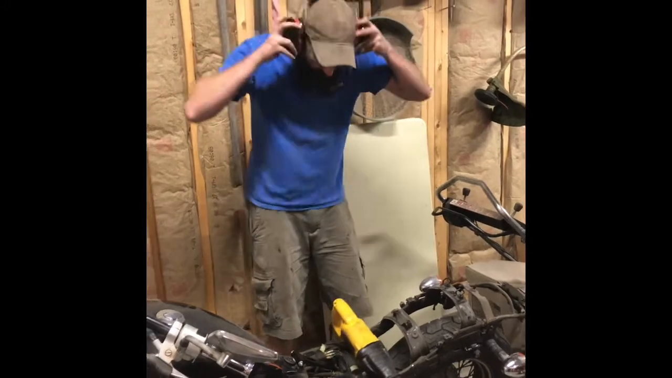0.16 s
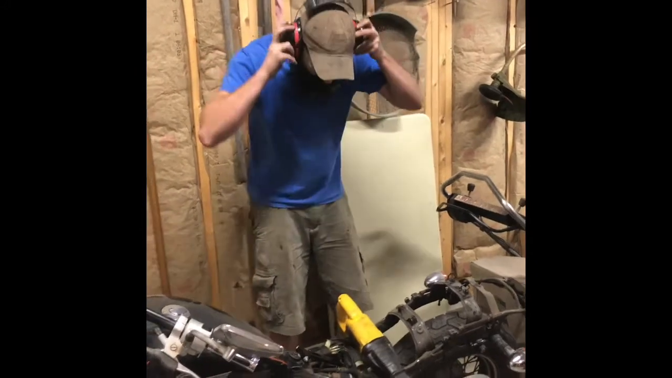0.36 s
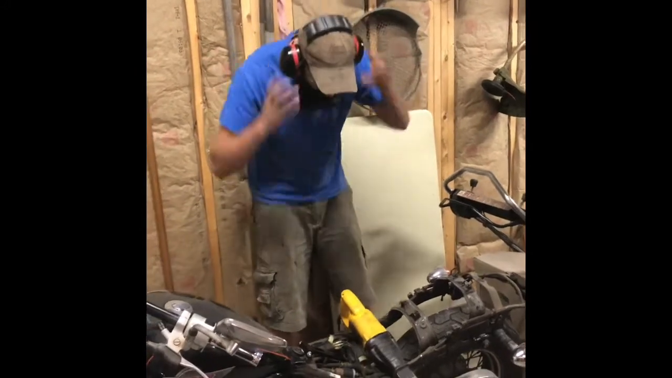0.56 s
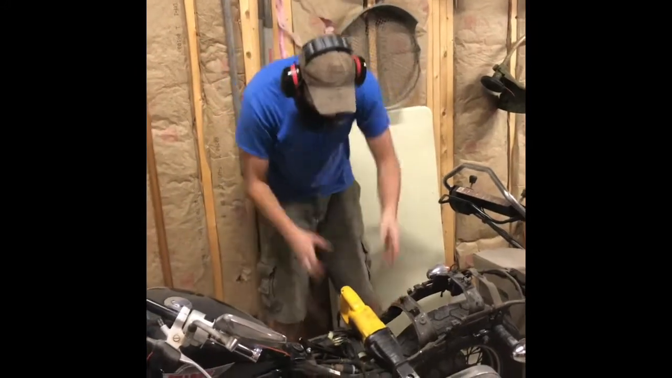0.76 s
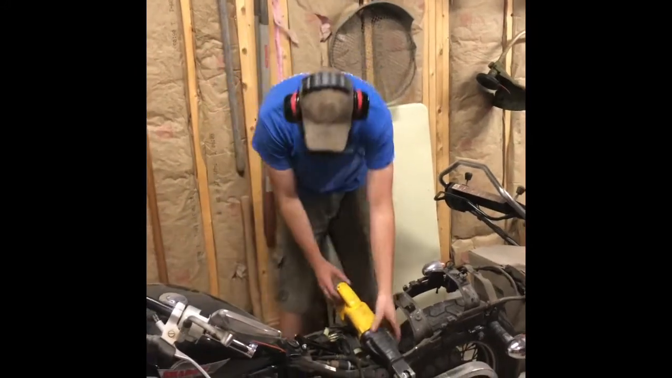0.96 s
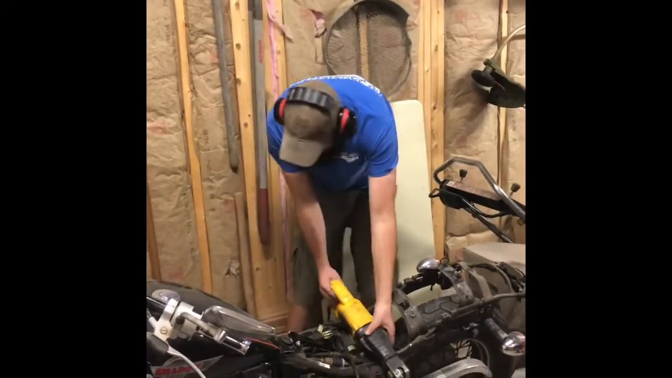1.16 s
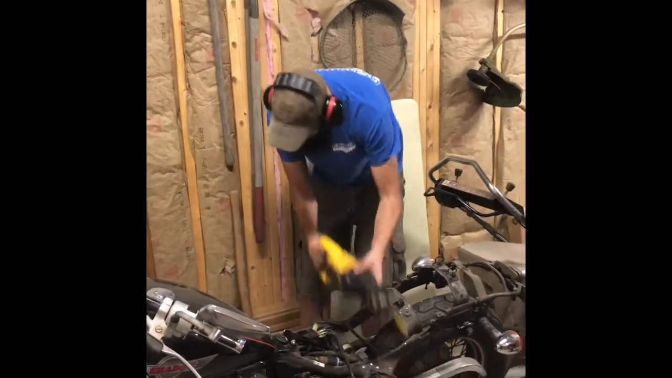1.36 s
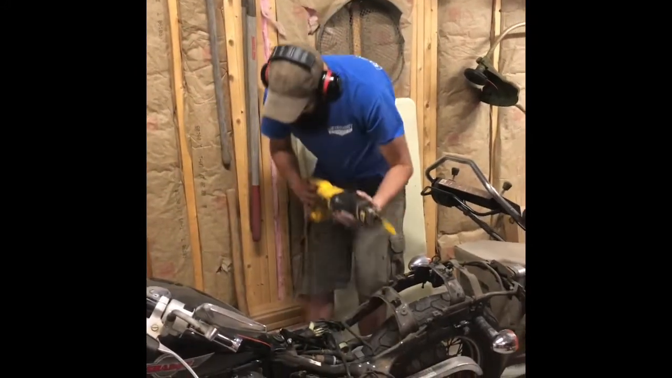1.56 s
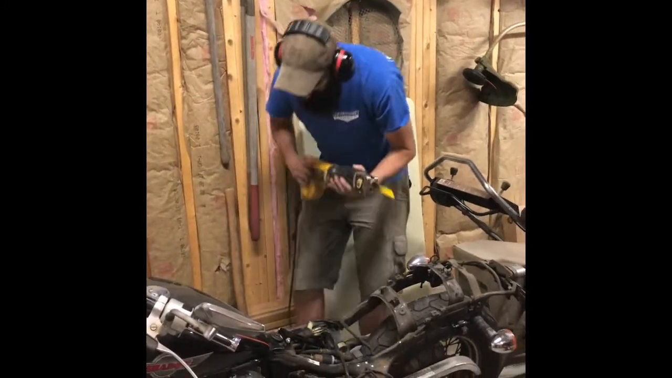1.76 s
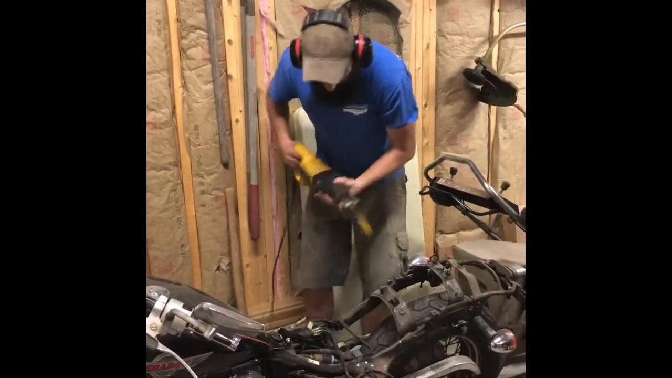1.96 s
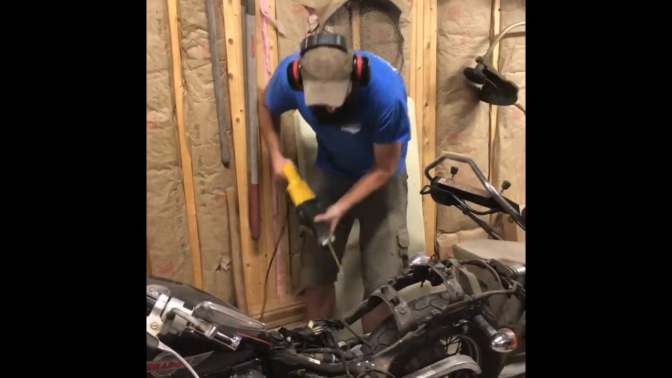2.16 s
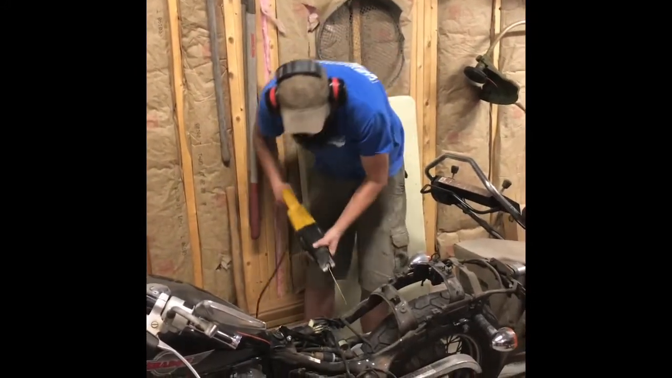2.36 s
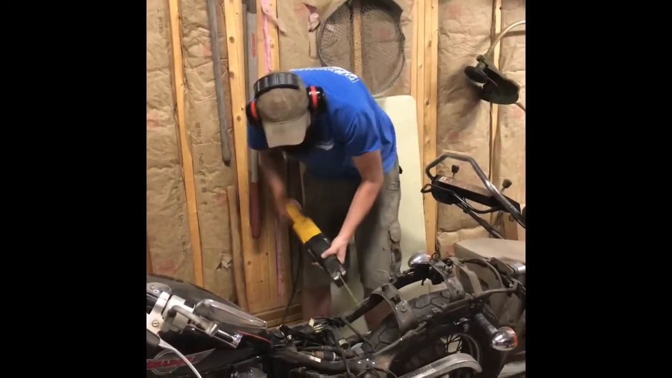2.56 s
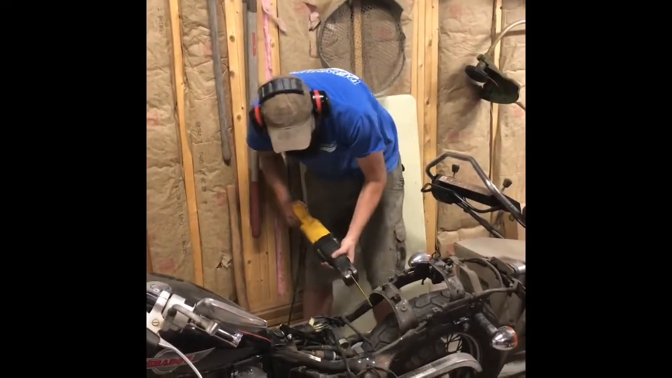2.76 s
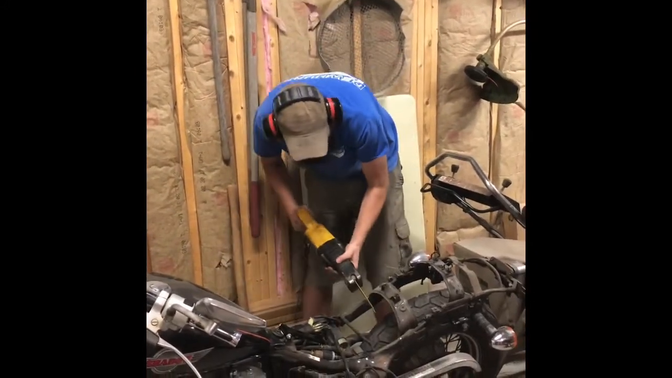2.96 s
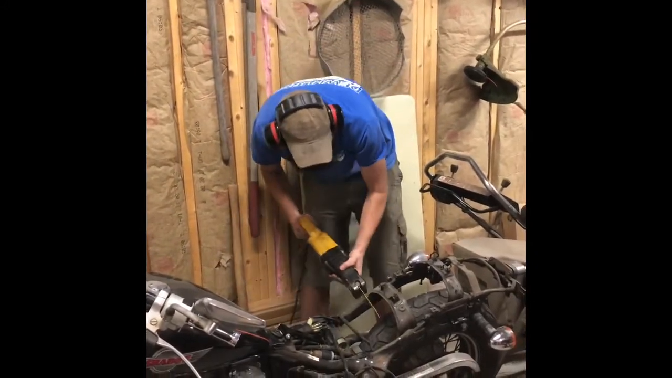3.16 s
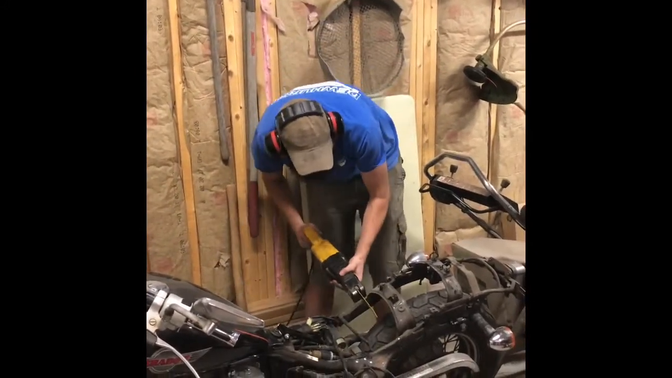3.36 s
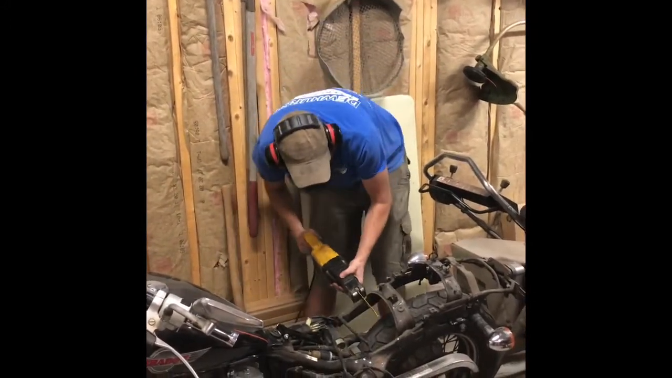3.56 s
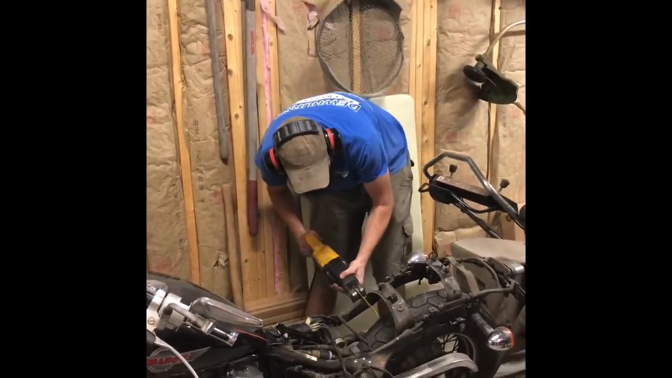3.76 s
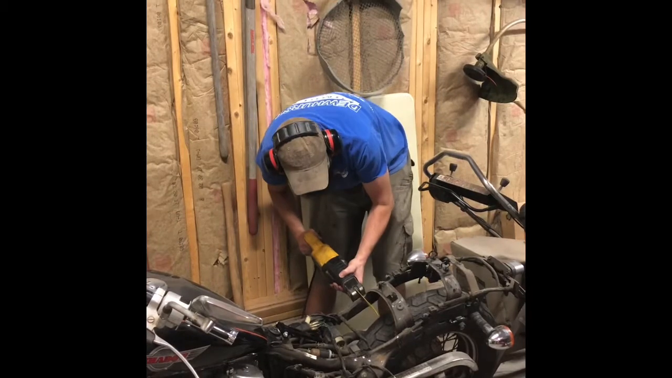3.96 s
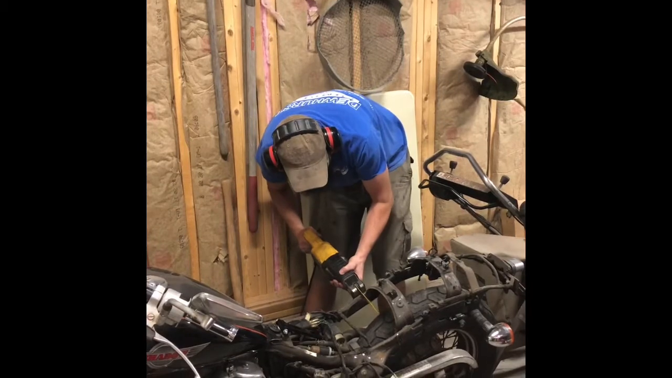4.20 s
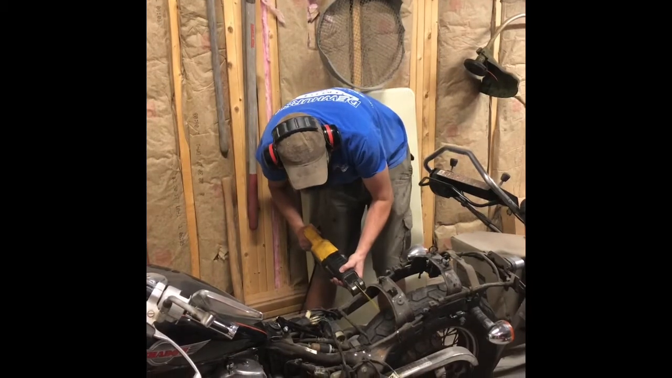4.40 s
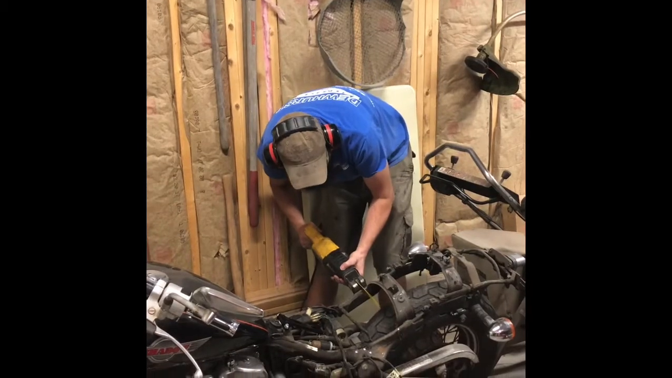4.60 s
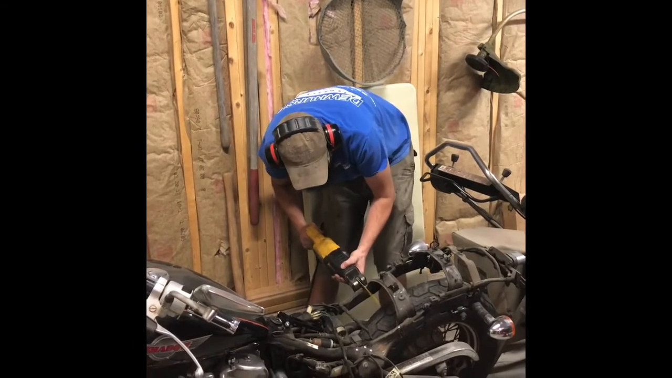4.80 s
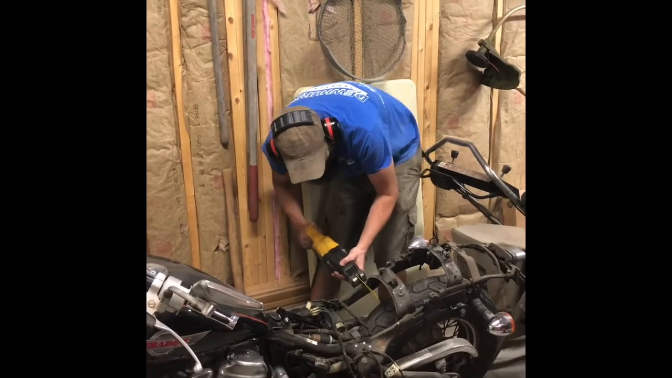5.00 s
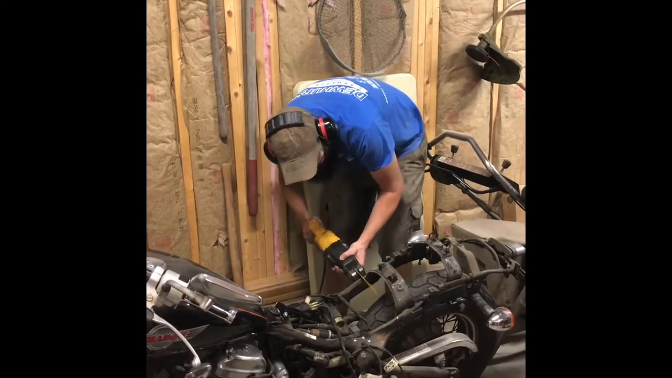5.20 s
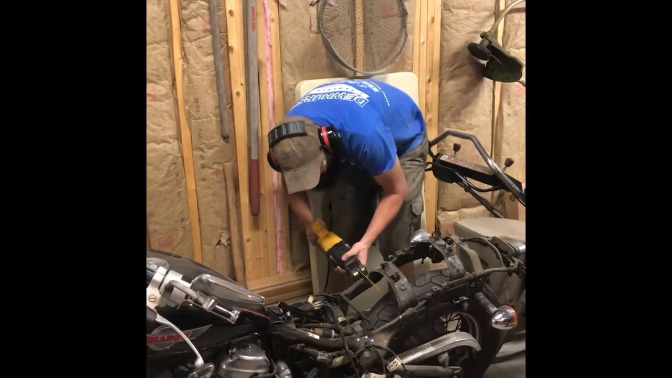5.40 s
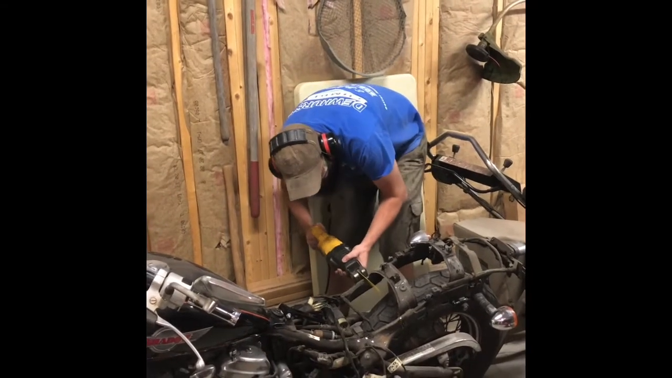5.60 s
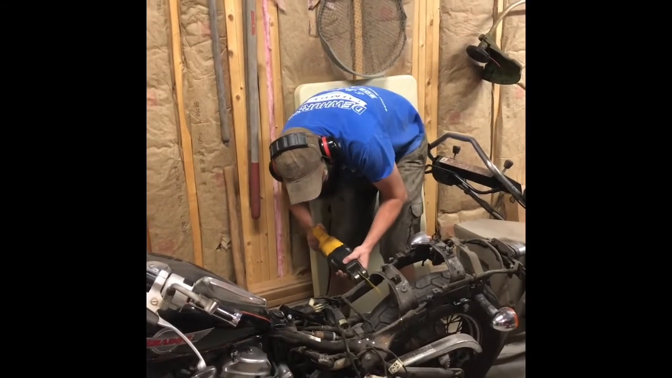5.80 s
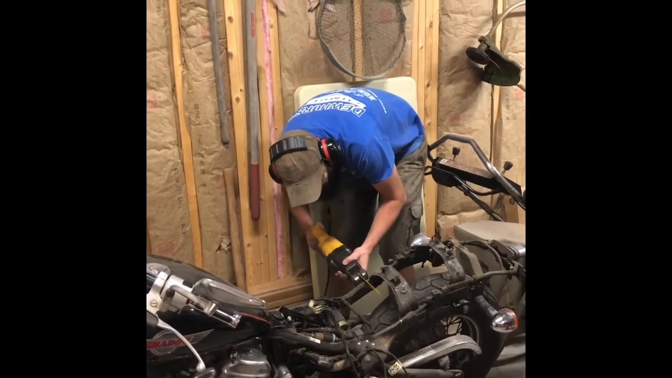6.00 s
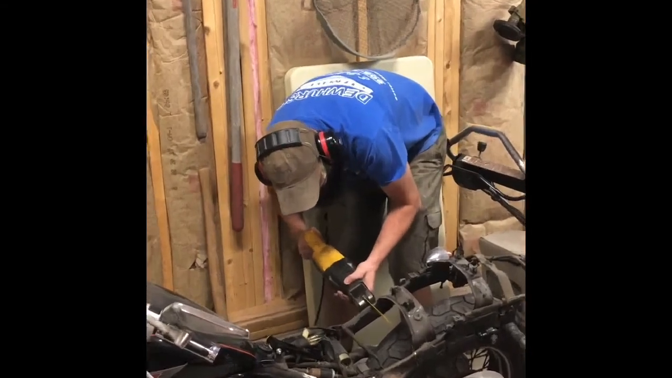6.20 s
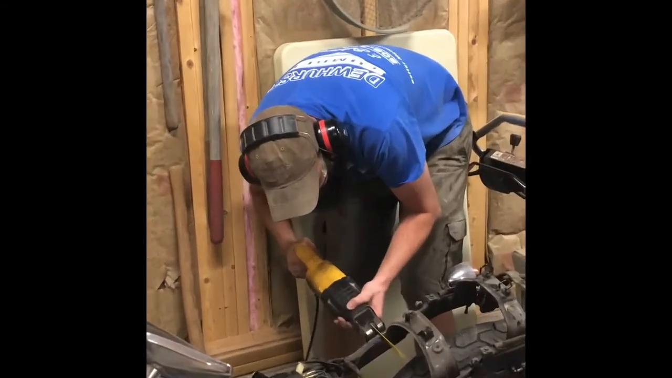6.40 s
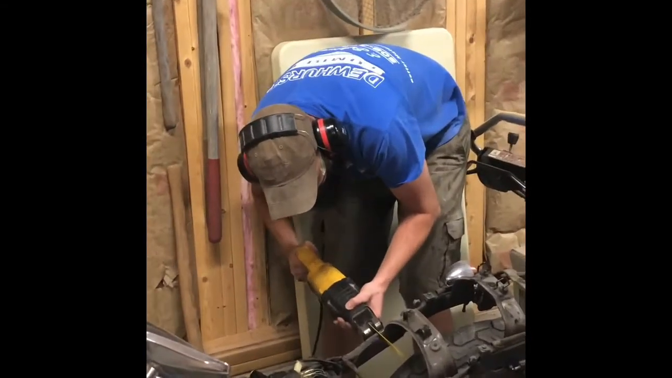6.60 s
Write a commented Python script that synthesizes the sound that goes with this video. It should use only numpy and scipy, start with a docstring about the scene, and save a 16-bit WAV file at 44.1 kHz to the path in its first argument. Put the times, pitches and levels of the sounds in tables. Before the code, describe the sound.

Faint rustling and small knocks, then a reciprocating saw speeds up and cuts loudly into steel in a small workshop.

```python
"""A reciprocating saw cuts into a steel motorcycle frame in a small workshop, slowly, then at full speed.
Its crank clatters by impact twice a stroke, its armature whines at multiples of the shaft speed,
and the teeth drive the steel into resonance as they bite deeper. Before that the saw is picked up:
clothes rustle by friction, the tool scrapes off its rest, feet thump on the floor, the trigger clicks."""
import sys
import numpy as np
from scipy import signal
from scipy.fft import rfft, irfft
from scipy.io import wavfile

SR = 44100
rng = np.random.default_rng(int(sys.argv[2]) if len(sys.argv) > 2 else 0)


def to_wav(s):
    """Save 16-bit WAV."""
    ch = np.atleast_2d(s).T  # columns
    pcm = np.round(np.clip(ch, -1, 1) * 32767)  # PCM
    wavfile.write(sys.argv[1], SR, pcm.astype(np.int16))


N = 293265
TIME = np.arange(N) / SR
GEAR_RATIO = 10  # shaft turns per stroke


def saw(shaft_hz):
    """Synchronous excitation: one shaft paces the clatter, rasp, whine and hum of the saw."""
    turns = np.cumsum(shaft_hz) / SR
    strokes = turns / GEAR_RATIO
    fast = np.clip((shaft_hz - 165) / 80, 0, 1)  # 0 when slow, 1 near full speed
    whine, hum = motor(shaft_hz, turns, strokes, fast)
    direct = crank(shaft_hz, strokes, fast) + cutting(shaft_hz, strokes) + whine
    # the tool rocks in the hands, so its echoes keep changing
    poses = np.array([wander(hz=8.4) for _ in range(4)])
    echoes = sum(workshop(direct * pose) for pose in poses / np.linalg.norm(poses, axis=0))
    # the tool is too small to radiate deep bass
    small_body = signal.butter(3, 85, "highpass", fs=SR, output="sos")
    effort = driven(shaft_hz, db=9, full_hz=278, db_per_octave=5.5, bite_db=4.5)
    return effort * signal.sosfilt(small_body, amp(-1.5) * direct + amp(-5) * echoes + hum)


def crank(shaft_hz, strokes, fast):
    """Backlash: the crank's play closes at each reversal with a burst of impact noise."""
    # clatter spectra at low and at full speed (frequency [Hz], relative level [dB])
    slow_spectrum = [(20, -70), (60, -25), (117, -7.5), (209, -47), (309, -2), (458, -11), (620, -1),
                     (800, -3), (916, 4.5), (1150, 3.5), (1630, 4.5), (2590, 0.5), (4110, -4), (15000, -17)]
    fast_spectrum = [(20, -75), (65, -56), (130, -34), (300, -46), (480, -32.5), (680, -9), (800, -14),
                     (1100, -9.5), (1700, -1.5), (2400, 1.5), (3500, -1.5), (6000, -5), (15000, -22.5)]
    beat = blows(strokes, phase=.096, decay=.73, back_db=.1, uneven_db=.06)
    knocks = evened(beat + .4) * grit(per_s=16000, spread_db=2)
    slow_clatter = (1 - fast) ** .95 * coloured(knocks, slow_spectrum)
    fast_clatter = amp(-3.5) * np.sqrt(fast) * coloured(knocks, fast_spectrum)
    gain = driven(shaft_hz, db=-19, full_hz=89.3, db_per_octave=12, bite_db=2, curve=3)
    return gain * (slow_clatter + fast_clatter)


def cutting(shaft_hz, strokes):
    """Impact excitation: the teeth rasp with each stroke, and blade and frame ring in their modes."""
    # spectrum of the teeth (frequency [Hz], relative level [dB])
    rasp = [(20, -90), (120, -65), (500, -44), (1500, -14), (2600, -2), (4300, 2.5), (6000, 1), (7500, 1),
            (9500, 0.5), (12000, -2), (14000, -2), (16000, -5.5)]
    # steel resonances (frequency [Hz], bandwidth [Hz], relative level [dB])
    blade_modes = [(2846, 40, -6.5), (3054, 100, 0.5), (3185, 110, -6.5), (4320, 55, -8), (4900, 380, -6.5),
                   (6670, 420, -6), (8500, 310, -2.5), (10430, 400, -5.5), (11300, 810, -2.5)]
    frame_modes = [(1136, 300, -9), (1396, 52, -2.5), (1856, 67, 2.5), (2305, 30, -4)]
    rasp_gain = driven(shaft_hz, db=-18.5, full_hz=169, db_per_octave=17.5, bite_db=1.5, curve=5.4)
    blade_gain = driven(shaft_hz, db=-34, full_hz=115, db_per_octave=20, bite_db=13.5, curve=1.2)
    frame_gain = driven(shaft_hz, db=-43.5, full_hz=79.4, db_per_octave=9, pressure_db=16.5)
    beat = blows(strokes, phase=.096, decay=.73, back_db=.1, uneven_db=.06)
    teeth = evened(beat + 2.4) * grit(per_s=14000, spread_db=-2.5)
    # the teeth catch sharply as the blade reverses
    bites = blows(strokes, phase=.12, decay=.27, back_db=-1, uneven_db=1.2)
    bites *= grit(per_s=14000, spread_db=1)
    # the shoe knocks against the frame on every pull, softly on the way back
    shoe = blows(strokes, phase=.18, decay=.15, back_db=-6, uneven_db=1.5) * rng.standard_normal(N)
    steel = blade_gain * ring(bites, blade_modes) + frame_gain * ring(shoe, frame_modes)
    return rasp_gain * coloured(teeth, rasp) + steel


def motor(shaft_hz, turns, strokes, fast):
    """Modulation and forced vibration: the stroke's load swings the whine; the shaken housing hums."""
    # commutator harmonics (multiple of the shaft speed, relative level [dB])
    harmonics = [(22, 1), (16, -2), (33, -6.5), (42, -6), (44, -21)]
    # housing response to the whine and to the crank's shaking (frequency [Hz], gain [dB])
    whine_response = [(1000, -12), (1420, 4.5), (1680, 1.5), (1850, -5), (2300, -11), (2560, 4.5),
                      (2900, 1), (3150, -3.5), (3400, 2), (3510, -4), (3610, 5), (3800, -1), (4700, -2),
                      (5120, 2.5), (5600, 0), (6800, 1.5), (14000, 1)]
    shake_response = [(40, -58), (95, -22), (125, -20.5), (150, -22), (185, -10.5), (210, -24.5), (235, -9),
                      (275, -32.5), (375, -20), (440, -18.5), (500, -27), (600, -8), (700, -11.5),
                      (850, -19.5), (1150, -10)]
    slot_count = 11
    slot_gain = driven(shaft_hz, db=-23.5, full_hz=128, db_per_octave=24, bite_db=-16, curve=6.4)
    commutator_gain = driven(shaft_hz, db=-26, full_hz=113, db_per_octave=16, bite_db=-16, curve=5.7)
    hum_gain = driven(shaft_hz, db=-35.5, full_hz=290, db_per_octave=8, bite_db=-4)
    stroke_angle, load_angle = 2 * np.pi * strokes, 4 * np.pi * (strokes - .17)
    swung = turns + .009 * np.sin(load_angle) + .004 * np.sin(stroke_angle) + .005 * wander(hz=120)
    slots = amp(2 * wander(hz=100)) * np.sin(2 * np.pi * slot_count * swung)
    jitter = .003 * wander(hz=300)
    commutator = sum(amp(db + 2.5 * wander(hz=201)) * np.sin(2 * np.pi * k * (swung + jitter))
                     for k, db in harmonics)
    # at low speed the armature has little momentum, so the whine comes in bursts
    load = 1 + (.85 - .65 * fast) * np.cos(load_angle)
    whine = filtered(load * (slot_gain * slots + commutator_gain * commutator), whine_response)
    # two reversals a stroke: the even multiples of the stroke rate shake hardest
    shake = sum(amp(read(shake_response, k * shaft_hz / GEAR_RATIO) - 3.5 * (k % 2))
                * np.sin(2 * np.pi * (k * strokes + rng.random())) for k in range(3, 39))
    # the field poles drone at twice the shaft speed, surging with the load
    surge = (1 + .4 * np.cos(stroke_angle) + .25 * np.cos(2 * stroke_angle)) * amp(2.2 * wander(hz=25))
    poles = surge * amp(-.5) * np.sin(4 * np.pi * swung)
    return whine, hum_gain * (shake + poles)


def blows(strokes, phase, decay, back_db, uneven_db):
    """Damped impacts: an envelope of two blows a stroke; phase in strokes, decay in half strokes."""
    halves = 2 * (strokes - phase) + 2
    count, age = np.floor(halves).astype(int), halves % 1
    size = amp(uneven_db * rng.standard_normal(size=400)[count] + back_db * (count % 2))
    return evened(size * np.exp(-age / decay) * (1 - np.exp(-age / .1)))


def driven(shaft_hz, db, full_hz, db_per_octave, bite_db=0, curve=1, pressure_db=0):
    """Power law: a part's gain grows with speed up to full_hz, and shifts with bite and pressure."""
    # contact with the frame (time [s], blade bite [0-1], shoe pressure [0-1])
    contact = [(4.4, .03, 0.1), (4.7, 0.22, 0.27), (5.0, 0.2, .4), (5.15, 0.43, 0.67), (5.45, 0.74, 0.85),
               (5.72, 0.76, 0.72), (6.05, .92, 1), (6.3, 1, 0.8), (6.65, 0.99, 0.9)]
    s, *controls = np.transpose(contact)
    bite, pressure = [np.interp(TIME, s, c).clip(0, 1) for c in controls]
    octaves = np.log2(np.clip(shaft_hz / full_hz, 1e-3, 1))
    level_db = db + db_per_octave * octaves + bite_db * bite ** curve + pressure_db * pressure
    return (shaft_hz > 0) * amp(level_db)


def handling():
    """Friction noise: ear muffs, sleeves and palms rub, and the plastic casing scrapes off its rest."""
    # brushing strokes (start [s], duration [s], rub level [dB], hiss level [dB])
    rustles = [(0.024, 0.25, -62.5, -61), (0.312, .08, -61, -59), (.695, 0.034, -54, -76),
               (.91, 0.18, -63.5, -65.5), (1.057, 0.11, -55.5, -60), (1.146, 0.26, -46, -60),
               (1.483, 0.066, -63, -62), (1.65, 0.19, -72, -71), (1.85, 0.074, -52, -59),
               (1.95, 0.14, -61, -64), (2.113, 0.053, -54, -64), (2.21, 0.08, -55, -71),
               (2.33, .12, -65, -69), (2.448, 0.066, -58.5, -65), (2.562, 0.06, -52.5, -55.5),
               (2.779, 0.074, -54, -61), (2.93, 0.25, -70, -72), (3.212, .04, -55, -64),
               (3.29, 0.11, -60, -69), (3.428, .09, -54, -68), (3.545, .045, -61, -68),
               (3.666, 0.029, -57, -64)]
    # the casing slides, harder as it comes free (start [s], duration [s], level [dB])
    slides = [(1.175, 0.26, -39.5), (1.33, 0.087, -41.5)]
    # friction spectra (frequency [Hz], relative level [dB])
    cloth_spectrum = [(300, -3), (1200, 2), (2500, -0.5), (4000, 1), (5800, 2), (7500, -12.5),
                      (11000, -9.5), (16000, -26)]
    hiss_spectrum = [(1000, -23), (4000, -4), (7500, -1.5), (11000, -2), (16000, -3)]
    scrape_spectrum = [(180, -46), (300, -17), (383, -8), (515, -28), (647, -3), (855, -11), (1130, -3.5),
                       (2520, -13), (5180, -8.5), (7920, -23), (15000, -23)]
    # casing resonances (frequency [Hz], bandwidth [Hz], relative level [dB])
    casing_modes = [(1164, 34, 0), (1900, 140, 1), (3030, 38, -3), (3730, 44, -4), (5030, 79, -13),
                    (5450, 90, -9)]
    start, length, rub_db, hiss_db = np.transpose(rustles)
    cloth = rubs(zip(start, length, rub_db), attack_s=.023, release_s=.023)
    cloth *= coloured(rng.standard_normal(N), cloth_spectrum)
    hiss = rubs(zip(start, length, hiss_db), attack_s=.038, release_s=.023)
    hiss *= coloured(rng.standard_normal(N), hiss_spectrum)
    slips = rng.standard_normal(N) * amp(.87 * wander(hz=60))
    scrape = amp(-3.5) * coloured(slips, scrape_spectrum) + amp(-11.5) * ring(slips, casing_modes)
    return cloth + hiss + rubs(slides, attack_s=.041, release_s=.014) * scrape


def rubs(rows, attack_s, release_s):
    """Incoherent addition: rubbing envelopes rise, hold and die away, and their powers add."""
    power = 0
    for s, length, db in rows:
        rise = np.clip((TIME - s) / attack_s, 0, 1)
        fall = np.exp(-np.maximum(TIME - s - length, 0) / release_s)
        power += (amp(db) * rise * fall) ** 2
    return np.sqrt(power)


def clicks():
    """Impact transients: plastic parts give dull bursts of noise, metal parts a decaying tone."""
    # ear muffs, grip and trigger (time [s], level [dB], tilt [dB/octave], t60 [s])
    plastic_hits = [(.718, -48, -5, 0.091), (2.135, -51, -3, 0.21), (3.142, -46, -5.5, 0.05),
                    (3.228, -42, -2, 0.054), (3.239, -42, -3, 0.065), (3.377, -47, -7, 0.13),
                    (3.575, -43, -10, 0.046), (3.675, -37, -3.5, 0.26), (3.748, -31.5, -4, 0.34)]
    # click spectrum before the tilt (frequency [Hz], relative level [dB])
    spectrum = [(30, -50), (150, -25), (600, -8), (1400, 2), (4000, 1.5), (7000, -4.5), (16000, -3)]
    # small metal parts of the saw (time [s], level [dB], frequency [Hz], t60 [s])
    clinks = [(2.141, -53, 2590, 0.5), (3.38, -47.5, 1390, 0.088)]
    out, t = np.zeros(N), TIME[:SR // 4]
    for s, db, tilt_db, t60 in plastic_hits:
        tilted = [(hz, level + tilt_db * np.log2(hz)) for hz, level in spectrum]
        add(out, s, amp(db - 60 * t / t60) * coloured(rng.standard_normal(len(t)), tilted))
    for s, db, hz, t60 in clinks:
        add(out, s, amp(db - 60 * t / t60) * np.sin(2 * np.pi * hz * t))
    return out


def thumps():
    """Free vibration: a soft footfall rings the floorboards, whose low modes swell last."""
    # footfalls (time [s], level [dB])
    footfalls = [(1.956, -42), (2.003, -42.5), (2.268, -29.5), (3.573, -53)]
    # board modes (nominal frequency [Hz], relative level [dB], t60 [s], swell [s])
    board_modes = [(97, -1, 0.21, 0.028), (130, -2, 0.097, 0.026), (200, -9.5, .12, 0.013),
                   (259, -7.5, .13, 0.0046), (351, -2.5, 0.065, 0.0027), (646, -10, 0.11, 0.0026),
                   (834, -5.5, 0.055, 0.00094), (1160, -15, 0.11, 0.0017), (1630, -13, 0.072, 0.0019)]
    out, t = np.zeros(N), TIME[:SR // 2]
    for s, db in footfalls:
        for hz, mode_db, t60, swell in board_modes:
            shape = amp(db + mode_db - 60 * (t - swell) / t60) * (1 - np.exp(-(t / swell) ** 2))
            add(out, s, shape * np.sin(2 * np.pi * hz * rng.uniform(.93, .98) * t))
    return out


def workshop(x):
    """Reverberation: close walls return dense echoes, each band dying at its own rate."""
    # reverberation times (frequency [Hz], t60 [s])
    decay_times = [(100, 0.25), (500, 0.36), (2000, 0.39), (6000, 0.37), (15000, 0.44)]
    length = SR // 2
    taps = rng.standard_normal(length) * (rng.random(length) < 3000 / SR) * (TIME[:length] > .003)
    hz, t, bands = signal.stft(taps, SR, nperseg=256)
    tail = signal.istft(bands * amp(-60 * t / read(decay_times, hz)[:, None]), SR, nperseg=256)[1]
    return signal.fftconvolve(x, tail / np.linalg.norm(tail))[:N]


def background():
    """Stationary noise: a faint, low rush fills the workshop."""
    # ambient spectrum (frequency [Hz], relative level [dB])
    spectrum = [(15, -49), (25, -35), (59, -0.5), (137, -12), (263, -6.5), (335, -15), (516, -11),
                (641, -13.5), (840, -11.5), (1160, -10.5), (1290, -16), (1650, -16.5), (2480, -20),
                (3720, -25.5), (7500, -34.5), (16000, -45)]
    return amp(-54) * coloured(rng.standard_normal(N), spectrum)


def ring(x, modes):
    """Resonance: x drives parallel band-pass modes; rms 1."""
    return evened(sum(amp(db) * evened(signal.lfilter(*signal.iirpeak(hz, hz / width, SR), x))
                      for hz, width, db in modes))


def grit(per_s, spread_db):
    """Shot noise: a dense train of tiny clicks of uneven size; rms 1."""
    sizes = rng.standard_normal(N) * amp(spread_db * rng.standard_normal(N).clip(-2, 2))
    return evened(sizes * (rng.random(N) < per_s / SR))


def wander(hz):
    """Low-pass noise: random drift up to about hz; rms 1."""
    lowpass = np.exp(-(np.fft.rfftfreq(N, 1 / SR) / hz) ** 2)
    return evened(irfft(rfft(rng.standard_normal(N)) * lowpass, N))


def coloured(x, spectrum):
    """Spectral shaping to rms 1."""
    return evened(filtered(x, spectrum))


def filtered(x, spectrum):
    """Zero-phase filtering by a spectrum in dB."""
    return irfft(rfft(x) * amp(read(spectrum, np.fft.rfftfreq(len(x), 1 / SR))), len(x))


def read(points, hz):
    """Linear interpolation over log frequency."""
    f, value = np.transpose(points)
    return np.interp(np.log(hz + 1), np.log(f + 1), value)


def evened(x):
    """Normalisation to rms 1."""
    return x / np.sqrt(np.mean(x ** 2) + 1e-20)


def amp(db):
    """Decibels to amplitude ratio."""
    return 10 ** (np.asarray(db) / 20)


def add(mix, s, sound):
    """Superposition of a sound on the mix at s seconds."""
    part = mix[round(s * SR):][:len(sound)]
    part += sound[:len(part)]


def scene():
    """Superposition: saw, handling and background sound in the same small room."""
    # half trigger, full trigger, then a sag in the cut (time [s], shaft speed [Hz])
    speed = [(3.74, 22), (3.8, 77), (3.89, 116), (3.99, 138.5), (4.11, 152.5), (4.29, 164.5), (4.38, 198.5),
             (4.53, 284.5), (4.6, 299.5), (4.7, 308.5), (4.92, 310.5), (5.1, 320.7), (5.25, 323.1),
             (5.4, 321), (5.8, 302.9), (6.38, 288.6), (6.65, 294.7)]
    sawing = saw(np.interp(TIME, *np.transpose(speed), left=0))
    pickup = handling() + clicks() + thumps()
    return np.tile(sawing + amp(-.86) * pickup + amp(-5) * workshop(pickup) + background(), (2, 1))


def record(dry):
    """Compression: gain control ducks the mix under the saw; peaks are rounded, the band is limited."""
    threshold_db, ratio, response_s, edge_hz = -18, 3.83, .023, 15850
    pole = np.exp(-1 / (response_s * SR))
    power_db = 10 * np.log10(signal.lfilter([1 - pole], [1, -pole], dry[0] ** 2) + 1e-12)
    held = dry / amp(np.maximum(power_db - threshold_db, 0) * (1 - 1 / ratio))
    rounded = held / (1 + (held / .8) ** 6) ** (1 / 6)
    lowpass = signal.firwin(511, edge_hz, window=("kaiser", 9), fs=SR)
    return signal.oaconvolve(rounded, lowpass[None], "same")


dry = scene()
out = record(dry)
to_wav(out)
```